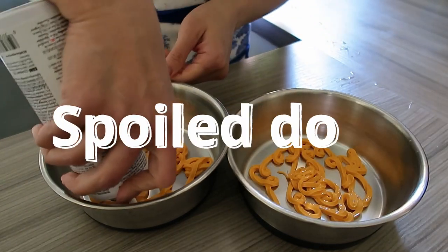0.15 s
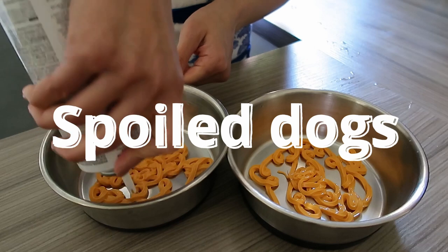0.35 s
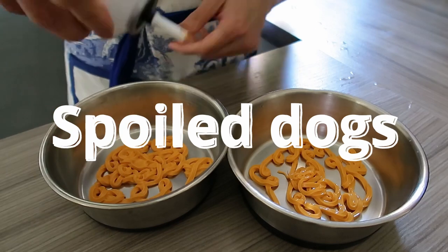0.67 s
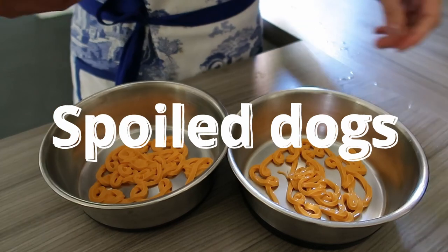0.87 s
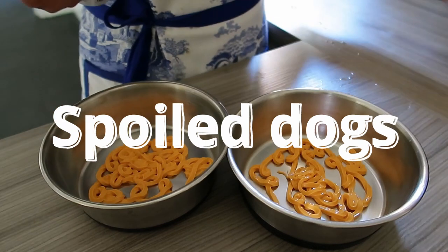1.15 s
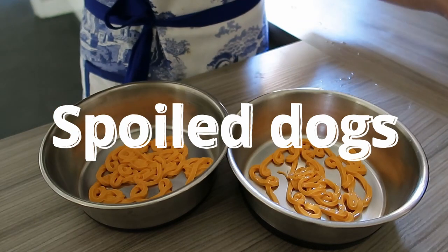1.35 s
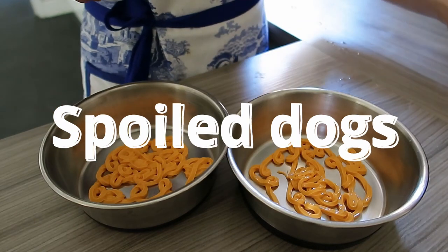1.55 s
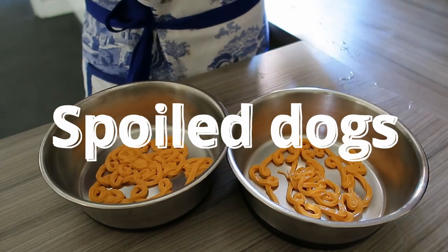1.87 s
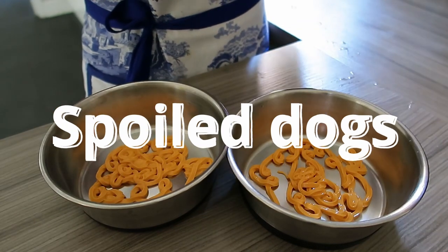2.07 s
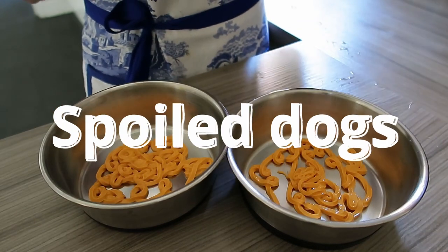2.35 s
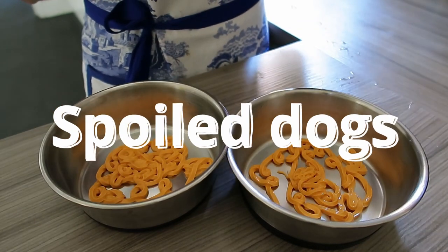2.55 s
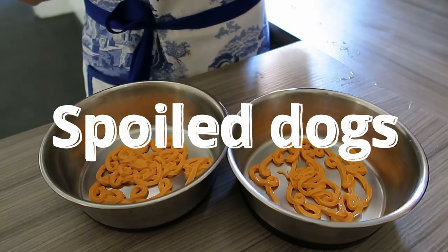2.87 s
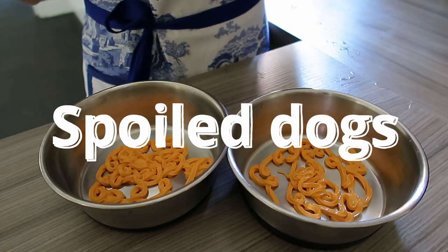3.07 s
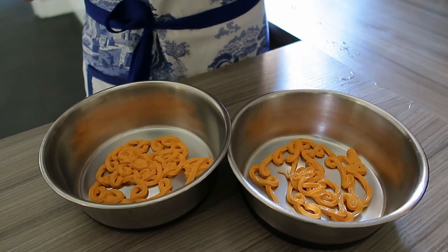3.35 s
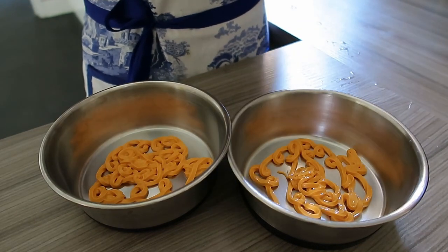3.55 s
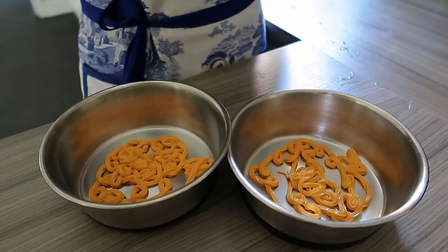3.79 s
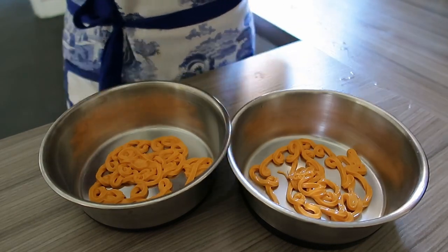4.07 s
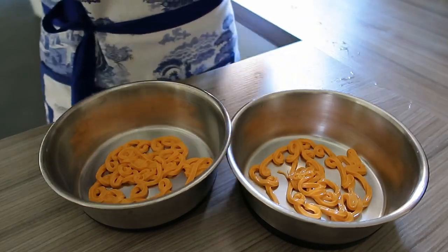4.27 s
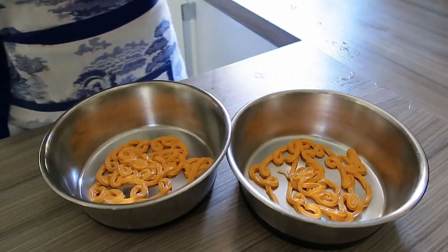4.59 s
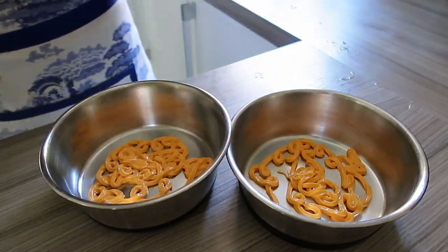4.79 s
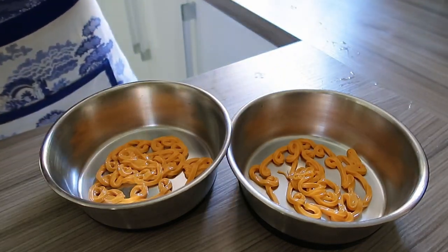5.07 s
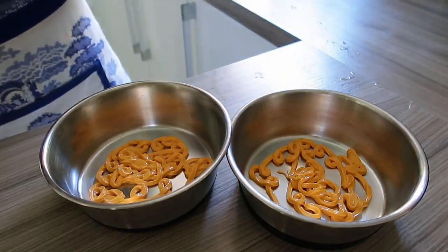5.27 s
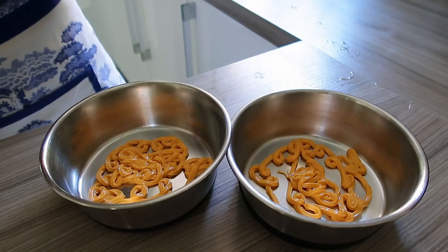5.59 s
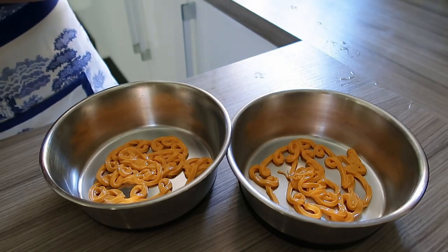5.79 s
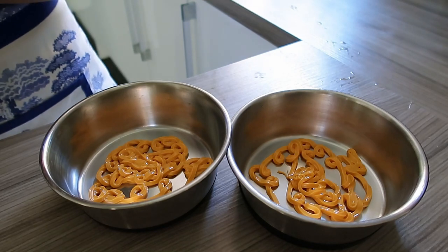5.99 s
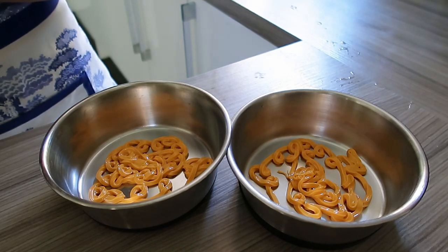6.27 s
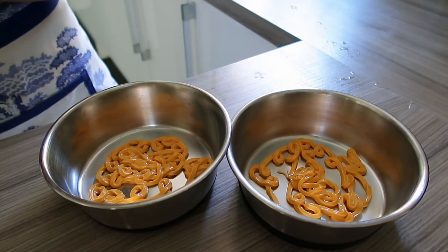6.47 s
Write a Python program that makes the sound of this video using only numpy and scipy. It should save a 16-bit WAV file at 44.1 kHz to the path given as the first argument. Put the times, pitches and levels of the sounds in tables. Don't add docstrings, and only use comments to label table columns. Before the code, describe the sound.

In an echoing kitchen, faint steel bowl taps give way to tin clacks, lid clicks, a very loud sharp snap, then a cupboard door bang.

```python
import sys
import numpy as np
from scipy import signal
from scipy.fft import rfft, irfft, next_fast_len
from scipy.io import wavfile

SR = 44100
rng = np.random.default_rng(int(sys.argv[2]) if len(sys.argv) > 2 else 0)


def dump_mix(stems):
    frames = np.atleast_2d(stems).T
    limited = np.clip(frames, -1, 1)
    pcm = np.round(limited * 32767).astype(np.int16)
    wavfile.write(sys.argv[1], SR, pcm)


def undo_db(level):
    steps = np.asarray(level, float) / 20
    return 10 ** steps


N = 292345

# start_s, level_db (peak), treble_db (against the whole)
TAP = [
    (0.059, -27, -21),
]
BOWL_HITS = [(.285, -33, -15), (.295, -30, -15), (.298, -29.5, -23), (.31, -30.5, -27), (.339, -34.5, -22)]
TIN_HITS = [(1.3275, -21, -12), (1.332, -19.5, -30), (1.366, -15.5, -45), (1.3855, -23.5, -45),
            (1.393, -23.5, -24), (1.715, -29.5, -7), (1.727, -3, -29), (1.735, -17, -21),
            (1.765, -22.5, -38), (1.784, -31, -26)]
CAP_HITS = [(2.769, -23, -24), (2.829, -15, -22.5)]
LID_HITS = [(2.921, -22, -4), (2.935, -1.5, -13), (2.961, -20.5, -15), (3.089, -25.5, -30),
            (3.172, -22.5, -18.5)]
SNAPS = [
    (3.314, -10.5, -48),
    (3.361, 8, -20),
    (3.365, 3, -30.5),
]
DOOR_HITS = [
    (5.3152, -14, -20),
    (5.318, -2, -38),
    (5.334, -19, -24),
]
KNOCKS = [(6.176, -31.5, -28), (6.205, -26, -23), (6.463, -35.5, -16)]
THUMP = [
    (3.672, -33.5, -20),
]
TICKS = [(4.958, -29.5, -36), (5.417, -29.5, -17), (5.519, -28, -20), (5.529, -40, -15),
         (5.789, -49, -22.5)]

# pitch_hz, level_db, t60_s (time to fade by 60 dB)
COUNTER = [(130, -5.5, 0.33), (1070, -7, 0.02), (1500, -6.5, 0.034), (2510, -5, 0.019),
           (3730, -17.5, 0.024)]
BOWL = [(128, -3.5, 0.22), (357.5, -5.5, 0.067), (1100, -6, 0.031), (1735, -6.5, 0.023),
        (2120, -11.5, 0.043), (2423, -13, 0.082), (2644, -24, 0.57), (5130, -17, 0.0085), (6600, -18, 0.01),
        (9400, -18, 0.01)]
TIN = [(131.8, -28, 0.29), (339, -31, 0.095), (1050, -11, 0.005), (1392, 1.5, 0.0097), (1457, -11, 0.11),
       (1880, -15, 0.0065), (3110, -19.5, 0.0065), (3805, -30.5, 0.089), (3800, -22, 0.0023),
       (5860, -31, 0.0068), (8900, -42.5, 0.0023)]
CAP = [(1223, -7.5, 0.017), (1877, -1, 0.028), (2143, -3, 0.027), (2823, -13.5, 0.0077), (3300, -15, 0.026),
       (4090, -19, 0.0135), (6800, -33.5, 0.0027)]
LID = [(1050, -9, 0.0068), (1364, -3.5, 0.026), (2090, -9, 0.0078), (3720, -4, 0.009), (4300, -9.5, .005),
       (6540, -24, 0.0025), (9130, -42, .003), (12830, -43.5, 0.0017)]
LATCH = [(1040, -11, 0.013), (1422, -3.5, 0.0032), (1800, -1.5, 0.0032), (2056, -2, 0.0036),
         (2370, -4, 0.011), (3040, -8.5, 0.005), (3550, -9, 0.0021), (6260, -19, .003),
         (12900, -24, 0.0018)]
DOOR = [(135, -8, 0.3), (234, -5, 0.049), (300, -8, 0.036), (382, -3.5, 0.023), (586, -5.5, 0.03),
        (782, -1.5, 0.014), (884, -6, 0.011), (1484, -17.5, 0.013), (2290, -16, 0.0036), (3000, -20, 0.013),
        (3860, -28, 0.0061), (5630, -35.5, 0.0026)]
DRAWER = [(420, -3, 0.022), (620, -7, 0.021), (884, -8.5, 0.027), (1400, -9, .01), (3530, -17, .006)]
PANEL = [(170, -19, .15), (227.4, -6.5, 0.34), (600, -7, 0.027)]
GRIT = [(2200, -2, 0.0024), (4100, -12, 0.0033), (7000, -12, 0.0022), (11000, -13, 0.0016)]

# low_hz, high_hz, t60_s
HARD = (970, 4430, 0.0051)
SHEET = (490, 3920, 0.0097)
STEEL = (350, 1460, 0.058)
WOOD = (91, 906, 0.017)

# knocks, tones, crack, crack_db, room_db, left_share (negative leans right)
BODIES = [
    (TAP, COUNTER, HARD, -18, -13.5, .04),
    (BOWL_HITS, BOWL, STEEL, -14.5, -3.5, .046),
    (TIN_HITS, TIN, SHEET, -16, -6, -.25),
    (CAP_HITS, CAP, HARD, -20, -13, -0.042),
    (LID_HITS, LID, HARD, -17, -10, -.04),
    (SNAPS, LATCH, HARD, -8, -9.5, -0.024),
    (DOOR_HITS, DOOR, WOOD, -7.5, 2.15, 0.053),
    (KNOCKS, DRAWER, WOOD, -9.5, -7.5, 0.031),
    (THUMP, PANEL, WOOD, 1.5, -0.7, .02),
    (TICKS, GRIT, HARD, -4, 4.3, .03),
]

# start_s, length_s, level_db (rms)
BRIGHT_STROKES = [(.279, 0.11, -60), (3.168, 0.032, -56), (5.43, 0.26, -61)]
TIN_SCRAPES = [(.28, 0.042, -41.5), (1.32, 0.15, -35.5), (6.458, 0.054, -54)]
TIN_DRAG = [(.95, .66, -63.5)]
HINGE_TURN = [(5.003, 0.11, -64)]
CAP_TWIST = [(2.769, .034, -31)]
LID_TWIST = [(2.898, 0.046, -34.5)]
CLOTH_STROKES = [(.502, 0.18, -71), (3.921, 0.12, -60.5), (4.063, 0.12, -55), (4.347, 0.15, -61),
                 (4.952, .1, -55.5), (5.264, 0.12, -54), (5.33, 0.3, -52)]
DRAWER_SLIDE = [(6.152, 0.1, -49.5)]
COUNTER_SHAKES = [(1.368, 0.13, -48), (6.168, 0.29, -55)]

# centre_hz, width_octaves, level_db
SURFACES = [
    (BRIGHT_STROKES, [(6900, 0.75, -1.5)]),
    (TIN_SCRAPES, [(1204, 0.68, -3.6)]),
    (TIN_DRAG, [(1410, 0.08, 1), (2320, 0.28, 0)]),
    (HINGE_TURN, [(1225, 0.1, -0.5)]),
    (CAP_TWIST, [(1888, 0.35, 1.4), (3760, 0.28, -13)]),
    (LID_TWIST, [(1580, 0.44, -.1), (3800, 0.35, -7.5)]),
    (CLOTH_STROKES, [(2350, 1.33, -0.3)]),
    (DRAWER_SLIDE, [(754, 1.06, 3.2), (2760, 0.45, -13)]),
    (COUNTER_SHAKES, [(175, 1.5, 1.2)]),
]

# pitch_hz, t60_s
ROOM_T60 = [(120, 0.45), (350, 0.68), (1000, 0.65), (2500, 0.71), (5000, 0.88), (10000, 0.2)]
# pitch_hz, level_db
ROOM_COLOUR = [(120, -5.5), (400, 1.5), (800, 3.5), (1800, 4), (4000, 2), (8000, 3), (14000, -14)]
# pitch_hz, level_db
SIDE_PICKUP = [(100, -31), (400, -23.5), (1500, -16), (3000, -9), (6000, 0), (10000, 13.5), (14000, 3.5)]
# pitch_hz, level_db (per Hz)
FLOOR_MID = [(55, -17), (78, -1.5), (150, -3), (400, -9.5), (1300, -19), (4000, -27), (12000, -43),
             (15500, -53)]
# pitch_hz, level_db (per Hz)
FLOOR_SIDE = [(35, -40.5), (60, -18), (210, -2), (400, -3.5), (750, -10.5), (3400, -20.5), (12900, -36),
              (15500, -45)]
# start_s, end_s
FOCUS = [(0.02, 1.2), (2.4, 2.75), (3.0, 3.3), (3.6, 5.0), (5.8, 6.62)]

FLOOR_MID_DB, FLOOR_SIDE_DB = -51.5, -56
HUM_HZ, HUM_DB = 49.4, -49
FOCUS_HZ, FOCUS_DB, FOCUS_PER_S = 4320, -54, 43
GAIN_KNEE_DB, GAIN_SHARE, GAIN_BACK_DB_PER_S = -19, 0.63, 11.5
CONTACT_HZ = 8700
SLIPS_PER_S = 7000


def at_hz(points, hz):
    table_hz, values = np.transpose(points)
    return np.interp(np.log(hz + 1), np.log(table_hz), values)


def rms_one(x):
    return x / np.sqrt(np.mean(x ** 2) + 1e-20)


def coloured(x, spectrum):
    size = next_fast_len(len(x))
    weights = undo_db(at_hz(spectrum, np.fft.rfftfreq(size, 1 / SR)))
    return irfft(rfft(x, size) * weights, size)[:len(x)]


def filtered(x, order, hz, kind="low"):
    return signal.sosfilt(signal.butter(order, hz, kind, fs=SR, output="sos"), x)


def ring(clicks, hz, t60):
    keep = undo_db(-60 / (max(t60, 1e-3) * SR))
    turn = 2 * np.pi * hz / SR
    return signal.lfilter([0, np.sin(turn)], [1, -2 * keep * np.cos(turn), keep * keep], clicks + 1e-18)


def hiss(spectrum, level_db):
    return undo_db(level_db) * rms_one(coloured(rng.standard_normal(N), spectrum))


def refrigerator():
    t = np.arange(N) / SR
    waver = np.interp(t, np.linspace(0, N / SR, 60), rng.standard_normal(60))
    return np.sqrt(2) * undo_db(HUM_DB + .5 * waver) * np.sin(2 * np.pi * HUM_HZ * t + 2.18)


def focus_motor():
    t = np.arange(N) / SR
    hunting = sum((t > start) & (t < end) for start, end in FOCUS)
    steps = hunting * (rng.random(N) < FOCUS_PER_S / SR) * undo_db(FOCUS_DB + 3.0 * rng.standard_normal(N))
    click = np.eye(1, SR // 50)[0]
    blip = ring(ring(click, FOCUS_HZ, .007), FOCUS_HZ, .007)
    return signal.oaconvolve(steps, blip / np.max(blip))[:N]


def kitchen(x, first_echo_s):
    t, echo = np.arange(SR) / SR, 0
    for hz in 90 * 2.0 ** np.arange(8):
        edges = [hz / np.sqrt(2), min(hz * np.sqrt(2), .45 * SR)]
        band = filtered(rng.standard_normal(SR), 2, edges, "band")
        t60 = at_hz(ROOM_T60, hz)
        echo = echo + band * undo_db(-60 * t / t60) / np.sqrt(t60 * SR / (2 * np.log(1000)))
    build_up = np.clip((t - first_echo_s) / 0.0014, 0, 1)
    echo = coloured(echo, ROOM_COLOUR) * build_up
    return signal.fftconvolve(x, echo)[:N]


def rubs():
    out = np.zeros(N)
    slipping = rng.random(N) < SLIPS_PER_S / SR
    slips = rng.standard_normal(N) * undo_db(0.83 * rng.exponential(1, N)) * slipping
    for strokes, resonances in SURFACES:
        for start, length, stroke_db in strokes:
            at, size = round(start * SR), round(length * SR)
            swell = np.abs(np.sin(np.pi * np.linspace(0, 1, size) ** 0.68)) ** 0.69
            pressure = undo_db(stroke_db) * swell
            for hz, octaves, level_db in resonances:
                edges = hz * 2.0 ** (np.array([-.5, .5]) * max(octaves, .05))
                grains = filtered(slips[at:at + size], 2, edges, "band")
                out[at:at + size] += undo_db(level_db) * pressure * rms_one(grains)
    return out


def struck(blows, modes, crack_db, low_hz, high_hz, crack_t60):
    start_s, peak_db, treble_db = np.transpose(blows)
    at = np.round((start_s + .0008) * SR).astype(int)
    first = at[0]
    size = min(at[-1] + SR // 3, N) - first
    bright = 1.1 * np.minimum(treble_db - treble_db[np.argmax(peak_db)], 11)
    clicks = np.zeros(size)
    clicks[at - first] = undo_db(peak_db + crack_db + bright * .5)
    fading = signal.lfilter([1], [1, -undo_db(-60 / (max(crack_t60, .001) * SR))], clicks + 1e-18)
    burst = filtered(fading * rng.standard_normal(N)[:size], 2, low_hz, "high")
    sound = filtered(burst, 3, high_hz) * np.sqrt(SR / 2 / high_hz)
    for k, (hz, level_db, t60) in enumerate(modes):
        tilt_db = bright * np.log2(max(hz, 2400) / 2400)
        clicks[at - first] = undo_db(peak_db + level_db + tilt_db) * (-1) ** k
        sound += ring(clicks, hz, t60)
    sound = filtered(sound, 3, 105.0, "high")
    sound = filtered(sound, 2, CONTACT_HZ)
    return np.pad(sound, (first, N - first - size))


def scene():
    handling = rubs()
    to_room, leftward = undo_db(-8.5) * handling, 0
    for blows, modes, crack, crack_db, room_db, share in BODIES:
        sound = struck(blows, modes, crack_db, *crack)
        handling = handling + sound
        to_room = to_room + undo_db(room_db) * sound
        leftward = leftward + share * sound
    mid = handling + kitchen(to_room, first_echo_s=0.00095) + refrigerator()
    between_ports = undo_db(-3.5) * np.gradient(handling)
    side = coloured(between_ports + kitchen(to_room, first_echo_s=0.0022), SIDE_PICKUP)
    side = side + leftward + focus_motor()
    mid = mid + hiss(FLOOR_MID, FLOOR_MID_DB)
    side = side + hiss(FLOOR_SIDE, FLOOR_SIDE_DB)
    return np.array([mid + side, mid - side])


def band_limit(x):
    return signal.sosfilt(signal.butter(12, 15820, fs=SR, output="sos"), x)


def record(dry):
    power = signal.lfilter([.004], [1, -.996], np.mean(dry ** 2, axis=0))
    level_db = 10 * np.log10(power + 1e-12)
    back = GAIN_BACK_DB_PER_S * np.arange(N) / SR
    duck_db = np.maximum.accumulate(GAIN_SHARE * (level_db - GAIN_KNEE_DB) + back) - back
    lag = np.exp(-1 / (0.019 * SR))
    gain = undo_db(-signal.lfilter([1 - lag], [1, -lag], np.maximum(duck_db, 0)))
    mix = np.clip(gain * dry, -1, 1)
    return band_limit(mix)


dry = scene()
out = record(dry)
dump_mix(out)
```